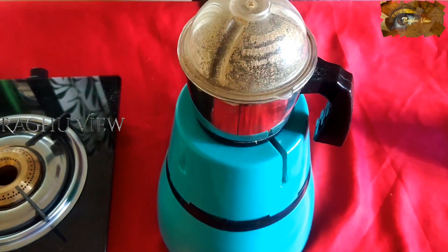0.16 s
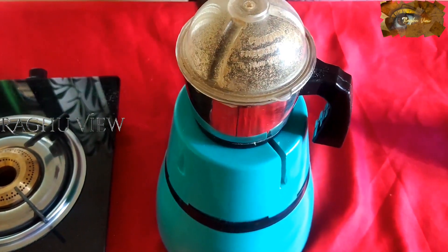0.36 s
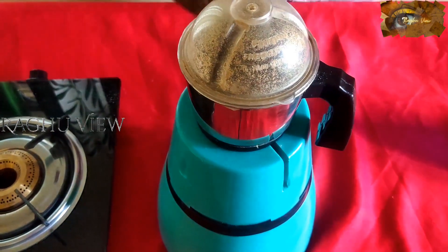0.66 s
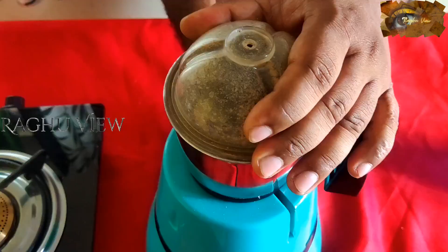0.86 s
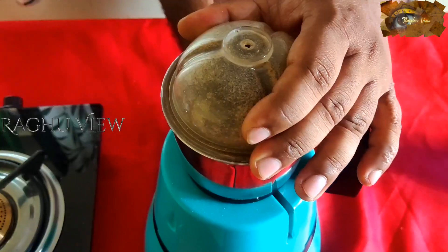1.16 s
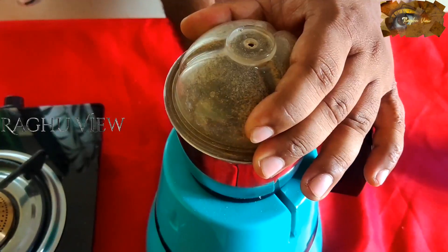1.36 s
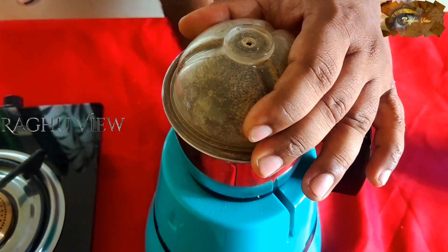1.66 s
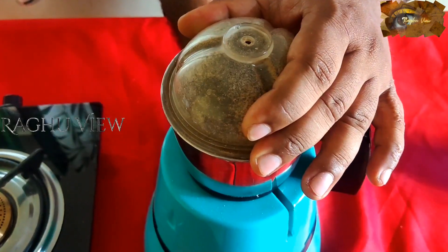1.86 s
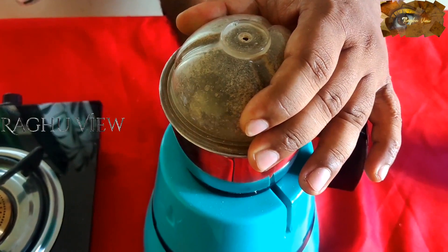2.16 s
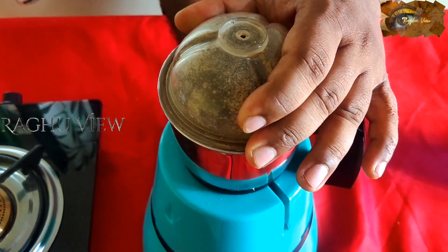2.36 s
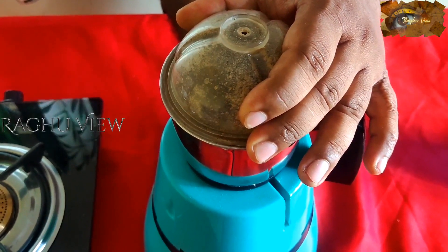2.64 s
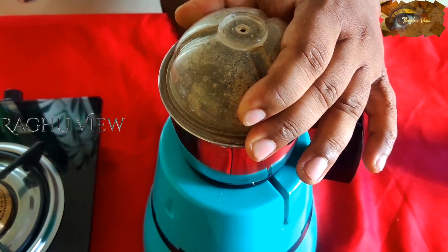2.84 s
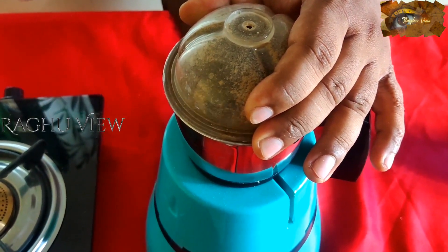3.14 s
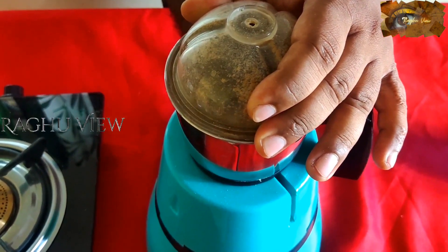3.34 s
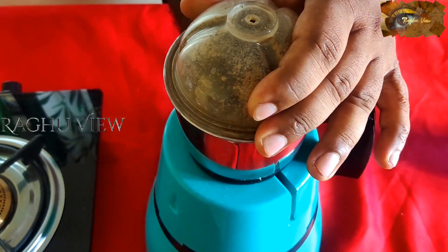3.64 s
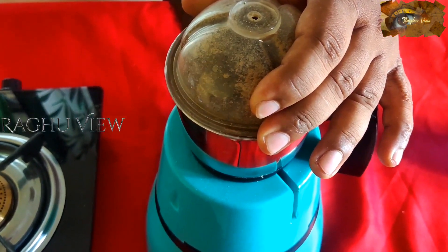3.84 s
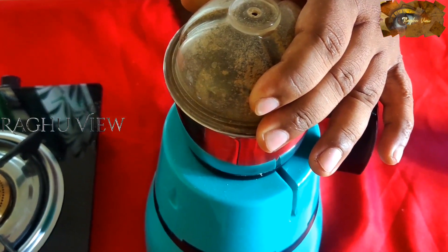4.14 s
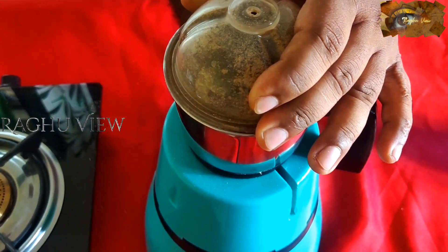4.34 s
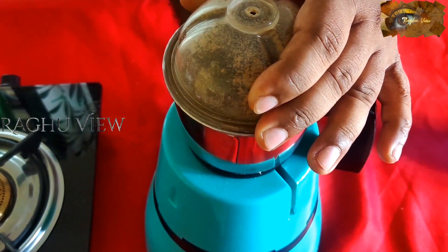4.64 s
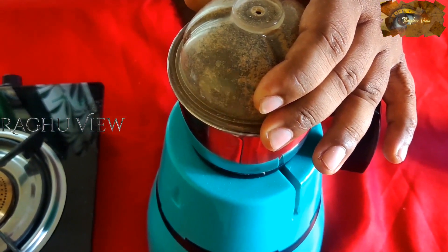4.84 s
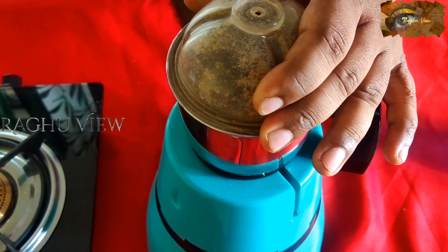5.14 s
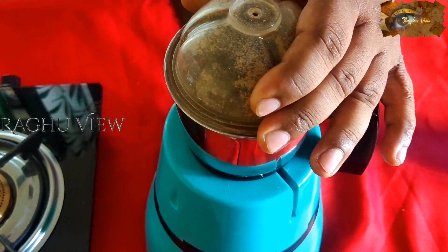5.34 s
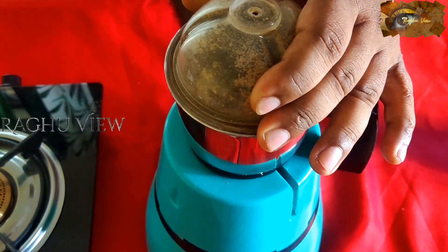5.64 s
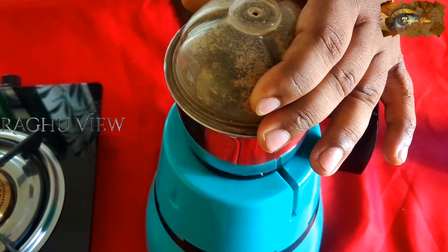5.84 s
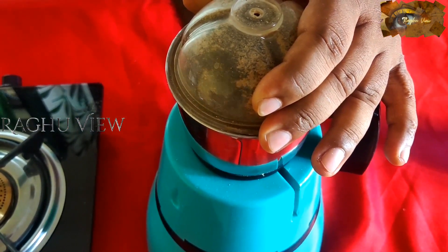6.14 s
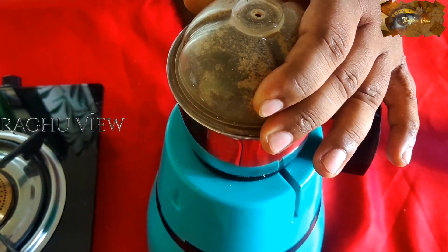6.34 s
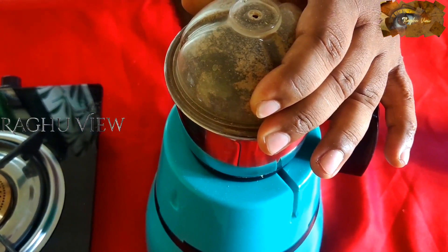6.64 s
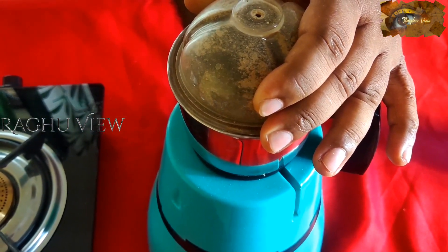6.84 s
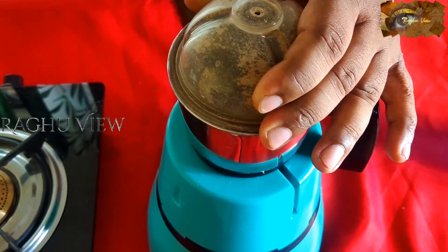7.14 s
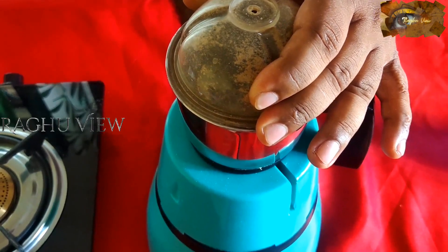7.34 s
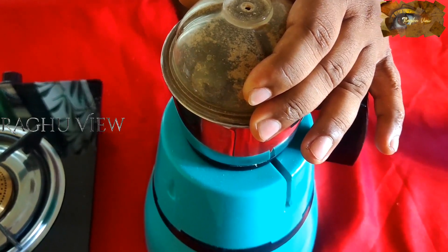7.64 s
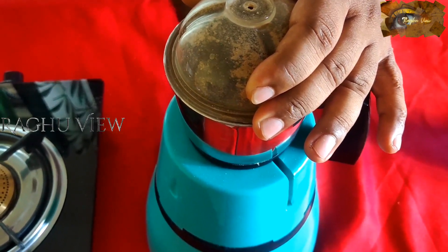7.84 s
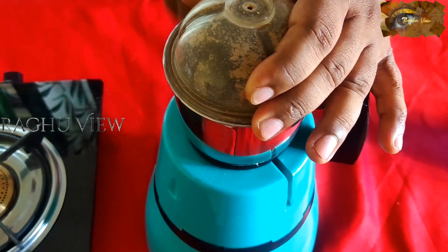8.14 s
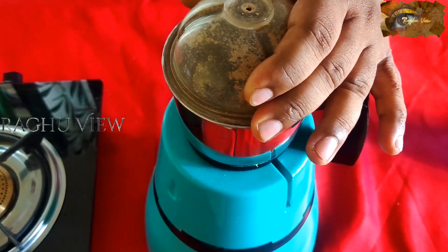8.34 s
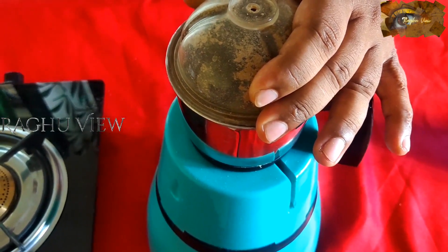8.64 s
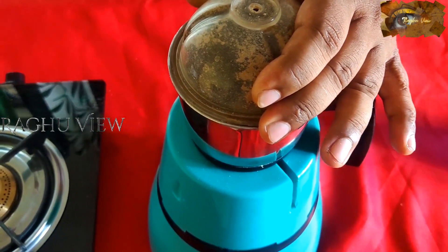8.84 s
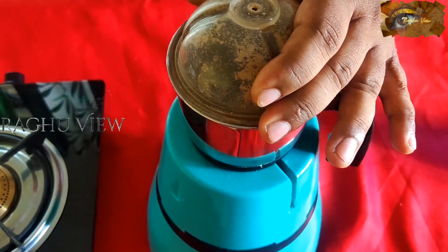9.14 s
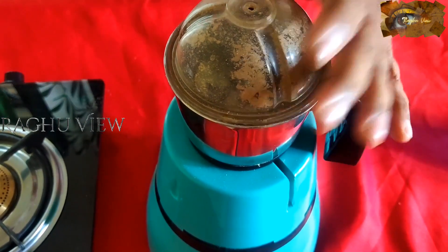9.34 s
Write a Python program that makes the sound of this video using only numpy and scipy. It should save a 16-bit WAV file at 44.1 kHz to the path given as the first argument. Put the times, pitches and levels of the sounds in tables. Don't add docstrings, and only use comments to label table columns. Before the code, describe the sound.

From 0 to about 0.2 s the last scrap of an earlier grinding burst dies away with tiny ticks, then near silence with a barely audible touch around 0.4 and 0.7 s. At 0.75 s a kitchen grinder starts abruptly at full loudness: a dense, bright, gritty roar of dry spices pelting a steel jar and lid, with a buzzing motor hum that rises slightly over the first two seconds and then holds. Larger pieces knock irregularly, and cooling air makes low pops and rumble on the close stereo microphone, mostly before 5 s. The hiss gradually softens as the spices get finer. At 7.4 s the power goes off; the hum slides down and blurs, loose fragments tumble and clatter from 7.6 to 8.7 s, duller and weaker. Soft housing touches follow around 9.0 to 9.4 s, fading into silence. Little room sound.

```python
import sys
import numpy as np
from scipy import signal
from scipy.fft import rfft, irfft, next_fast_len
from scipy.io import wavfile
from scipy.ndimage import uniform_filter1d, minimum_filter1d

SR = 44100
rng = np.random.default_rng(int(sys.argv[2]) if len(sys.argv) > 2 else 0)


def amp(db):
    return 10 ** (np.asarray(db, float) / 20)


def write(x):
    x = np.atleast_2d(x).T
    wavfile.write(sys.argv[1], SR, np.round(np.clip(x, -1, 1) * 32767).astype(np.int16))


N = 418499

HZ = np.fft.rfftfreq(next_fast_len(N), 1 / SR)
SWITCH_ON_S, SWITCH_OFF_S = 0.7526, 7.42


def rms_one(x):
    return x / np.sqrt(np.mean(x ** 2) + 1e-20)


def in_time(rows):
    s, *columns = np.transpose(rows)
    return np.array([np.interp(np.arange(N) / SR, s, c) for c in columns])


def at_hz(points):
    hz, value = np.transpose(points)
    return np.interp(np.log(HZ + 1), np.log(hz + 1), value)


def dying(x, t60):
    return signal.lfilter([1], [1, -amp(-60 / (t60 * SR))], x + 1e-18)


def softened(x, rise_ms):
    r = np.exp(-1000 / (rise_ms * SR))
    return signal.lfilter([(1 - r) ** 2], [1, -2 * r, r * r], x)


def drift(rate):
    r = np.exp(-80 * np.pi * rate / SR)
    slow = signal.lfilter([1], [1, -2 * r, r * r], rng.standard_normal(N // 40 + 2002))[2000:]
    return np.interp(np.arange(N) / 40, np.arange(len(slow)), rms_one(slow))


SPLITS_HZ = [450, 2300, 5600, 10000]
# (frequency [Hz], likeness [0 to 1])
LIKENESS = [(60, .1), (120, 0.36), (240, 1), (480, 0.83), (950, 0.082), (1890, 0.41), (3300, 0.23),
            (4500, 0.53), (5200, 0.16), (6500, 0.062), (9000, 0.15), (15000, .05)]
# (frequency [Hz], lead [radians])
LEAD = [(0, -1.5), (3620, 0.46), (4220, 1.5), (4480, -7), (5170, -8), (6370, -13), (7150, -10.5),
        (8100, -20.5), (8960, -16.5), (12000, -21), (13500, -20.5), (15200, -27)]


def grinding(turn):
    shower_db, pan_db = shower()
    levels = amp(shower_db + np.array([[1.5], [-1.5], [1.5], [1.5], [1.5]]))
    resting = (np.arange(N) < .4 * SR) | (np.arange(N) > SWITCH_ON_S * SR)
    coarse = grains(turn, per_s=250, spread_db=7.5, t60=0.057, steady=4.6, beat=.055)
    fine = grains(turn, per_s=370, spread_db=2.0, t60=0.032, steady=1.83, beat=.12)
    blows = knocks([0.075, 0.024, 0.027, 0.022, 0.032], 0.35, room_db=-16.5, rise_ms=1.6)
    loudness = np.hypot(resting * levels * [coarse ** 1.2, coarse, coarse, fine, fine], blows)
    loudness = loudness ** 2 / (loudness + amp(-85))

    below = [1 / (1 + (HZ / hz) ** 8) for hz in SPLITS_HZ]
    bands = np.diff([0 * HZ, *below, 1 + 0 * HZ], axis=0)
    jar = jar_response()
    alike = np.clip(at_hz(LIKENESS), 0, .99)
    lead = np.exp(.5j * at_hz(LEAD))
    white, out = rng.standard_normal((2, N)), 0
    for band, level in zip(bands, loudness):
        mid, side = rfft(white * level, next_fast_len(N))
        mid, side = np.sqrt(1 + alike) * mid, np.sqrt(1 - alike) * side
        colour = band * jar / np.sqrt(2 * np.mean(np.abs(band * jar) ** 2))
        out = out + colour * [(mid + side) * lead, (mid - side) / lead]

    gate_db = [(.36, 0), (.44, -60), (SWITCH_ON_S - .004, -60), (SWITCH_ON_S - .001, -12),
               (SWITCH_ON_S + .002, 0)]
    pan = amp((pan_db - 1.5) / 2 * [[1], [-1]])
    return amp(in_time(gate_db)) * irfft(out, next_fast_len(N))[:, :N] * pan


# (time [s], level [dB])
VIGOUR = [(.751, 0.5), (.84, 1.5), (.92, 0), (1.23, 2), (1.4, 0.5), (2.3, 0.5), (2.61, 0.5), (5.07, 0),
          (7.27, -0.5), (7.41, 1), (7.53, 0.5), (8.13, -0.5), (8.5, -7.5), (8.58, -8.5), (8.7, -22),
          (8.89, -23), (9.05, -49), (9.49, -76)]
# (level [dB], change as the spice gets finer [dB/s], step at switch-off [dB],
# share of the vigour [ratio])
SHOWER_BANDS = [
    (-19, -0.19, -0.5, 1.01),
    (-22.5, 0.02, -6, 1.28),
    (-19, 0.08, -8, 0.89),
    (-15.5, -0.5056, -1.5, 1.75),
]
# (level [dB], fall [dB/s])
EARLIER = [
    (-42, 134.5),
    (-35.5, 198.5),
    (-45.5, 150),
    (-43, 146.5),
    (-43, 137),
]


def shower():
    t = np.arange(N) / SR
    vigour_db, = in_time(VIGOUR)
    off = np.clip((t - SWITCH_OFF_S) / 0.1, 0, 1)
    worn_s = np.clip(t, SWITCH_ON_S, SWITCH_OFF_S) - SWITCH_ON_S
    running_db = [-33.5 - 81.5 * np.maximum(t - 8.75, 0)]
    for db, wear_db, step_db, share in SHOWER_BANDS:
        running_db.append(db + wear_db * worn_s + step_db * off + share * vigour_db)
    earlier_ends_s = 0.09
    earlier_db = [db - fall_db * np.maximum(t - earlier_ends_s, 0) for db, fall_db in EARLIER]
    settled_s, running_pan_db, coasting_pan_db = 8.75, 0.5, 2.5
    leaning = off - np.clip((t - settled_s) / 0.092, 0, 1)
    pan_db = running_pan_db + leaning * (coasting_pan_db - running_pan_db)
    return np.where(t < SWITCH_ON_S / 1.5, earlier_db, running_db), pan_db


def grains(turn, per_s, spread_db, t60, steady, beat):
    sizes = amp(spread_db * np.minimum(rng.exponential(1, N), 5))
    struck = sizes * (rng.random(N) < per_s * amp(2.5 * drift(14)) / SR)
    pulsing = 1 + beat * np.cos(turn) + beat * 1.2 * np.cos(2 * turn)
    strikes = rms_one(softened(dying(struck, t60), rise_ms=.9))
    return rms_one((steady + strikes) * pulsing)


# (time [s], peak [dB], brightness [dB])
KNOCKS = [(0.793, 0, -9), (1.13, -2.5, -9), (1.358, -5.5, -7.5), (1.536, -6, -5.5), (1.607, 0, -10),
          (2.008, -5, -11), (2.078, -0.5, -3.5), (2.226, -10, -4), (3.256, -3.5, -11), (3.787, -9.5, -2.5),
          (3.903, -1.5, -4.5), (4.032, -1, -3), (4.179, -9.5, -2), (5.039, -3, -4), (5.309, 0, -7),
          (5.444, -3, -6.5), (5.552, -7.5, -4), (6.055, -8, -6.5), (6.255, -4.5, -8.5), (6.566, -1.5, -6)]
# (time [s], peak [dB], brightness [dB], thud [dB])
TUMBLES = [(0.004, -24.5, -11, -12), (0.04, -17.5, -21, -21), (7.667, -12.5, -16, -8.5),
           (7.771, -10, -6.5, -17.5), (7.888, -16.5, 3.5, -14), (7.981, -11.5, -4.5, -15.5),
           (8.035, -9.5, -9.5, -12.5), (8.071, -16.5, -4.5, -12.5), (8.179, -13.5, -5.5, -15.5),
           (8.207, -15.5, -9, -15), (8.242, -8.5, -9.5, -21.5), (8.271, -14, -13.5, -11.5),
           (8.337, -9, -15.5, -12.5), (8.366, -21, -13, -11), (8.431, -14, -13, -15),
           (8.5, -9.5, -9.5, -15), (8.557, -13.5, -10, -23), (8.592, -13.5, -13.5, -23),
           (8.633, -16, -21, -24.5), (8.664, -17.5, -22, -17), (8.686, -17.5, -14.5, -21),
           (8.782, -15, -25.5, -26.5), (8.833, -12, -35, -17.5), (8.878, -25, -31, -9.5),
           (8.927, -25.5, -24.5, -9.5), (8.969, -23, -17, -22), (9.011, -40.5, -24, -10.5),
           (9.231, -41, -13, -7), (9.248, -38.5, -14, -5.5), (9.261, -42.5, -18, -6.5)]
# (level against the peak [dB], share of the brightness [ratio],
# share of the thud [ratio])
BLOW_COLOUR = [
    (-3, .01, 1.18),
    (-6, 0.037, -0.099),
    (-9, 0.075, 0.023),
    (0, .55, -0.069),
    (10, 1.42, 0.12),
]


def knocks(t60, room_t60, room_db, rise_ms):
    knock_offset_db, knock_thud_db = -3.5, -12
    powered = [(s, db + knock_offset_db, bright, knock_thud_db) for s, db, bright in KNOCKS]
    s, peak_db, bright_db, thud_db = np.transpose(powered + list(TUMBLES))
    band_db = [peak_db + db + bright * bright_db + thud * thud_db for db, bright, thud in BLOW_COLOUR]
    blows = np.zeros((5, N))
    blows[:, (s * SR).astype(int)] = amp(band_db)
    ringing = np.array([dying(row, t) for row, t in zip(blows, t60)])
    return softened(ringing + amp(room_db) * dying(blows, room_t60), rise_ms)


# (frequency [Hz], width [Hz], left level [dB], right level [dB])
JAR = [(289, 67, 5, 4.5), (686, 336, 10, 11), (1373, 146, 16, 10.5), (1927, 390, 15.5, 13.5),
       (2662, 440, 6, 5.5), (3560, 88, 6, 4), (4057, 76, 8.5, 3.5), (4830, 220, 4.5, -16.9),
       (6320, 700, 6, 1), (7000, 580, 9, 3), (8610, 900, 2.5, 7), (10500, 250, -6.5, -4),
       (11920, 260, 8, -6), (13440, 1100, 7.5, 0)]
# (frequency [Hz], level per Hz [dB])
BODY = [(60, -32), (120, -14), (250, 0.5), (500, -8.5), (1000, -3.5), (2300, -7.5), (3300, -1.5),
        (5000, 0.5), (7500, -1.5), (10000, -3.5), (15500, -6.5)]


def jar_response():
    response = amp(at_hz(BODY)) * np.ones((2, 1), complex)
    for hz, width, *side_db in JAR:
        gain = np.sqrt(amp(np.array(side_db)))[:, None]
        spring = hz ** 2 - HZ ** 2
        response = response * (spring + 1j * HZ * width * gain) / (spring + 1j * HZ * width / gain)
    return response


# (multiple of its speed, level against the curve [dB], left-right [dB])
IMBALANCE = [(1, -0.99, -8)]
# (multiple of shaft speed, level against the curve [dB], left-right [dB])
BLADE = [(3, -.1, -5)]
# (multiple of shaft speed, level against the curve [dB], left-right [dB])
FAN = [(9, -0.13, 2.1)]
# (multiple of shaft speed, level against the curve [dB], left-right [dB])
OTHER_ORDERS = [(2, -8, -2), (4, -3.5, -2), (5, -4, 10), (6, -0.6, -6.5), (8, -8, -4.5), (15, -10, -4),
                (19, -8.5, 8.5)]
# (multiple of shaft speed, level [dB], left-right [dB])
EARLY_ORDERS = [(7, -0.6, 6.5), (10, -3, -2.5)]


def motor(turn, levels_db):
    out = np.zeros((2, N))
    sounding, = in_time([(.82, 0), (1.12, 1), (8.0, 1), (8.3, 0)])
    coasting, = in_time([(7.4, 0), (7.5, 1)])
    wobbling = turn + (0.046 + .09 * coasting) * drift(12)
    for orders, curve_db in zip([IMBALANCE, BLADE, FAN, OTHER_ORDERS, EARLY_ORDERS], levels_db):
        waver_db = 1.0 + (2.2 if len(orders) > 1 else 0) + 3 * coasting
        for multiple, db, pan_db in orders:
            tone = np.sin(round(multiple) * wobbling + 2 * np.pi * rng.random())
            level_db = curve_db + db + waver_db * drift(12.4) - 0.45 * multiple * coasting
            out += np.sqrt(2) * amp(level_db) * tone * amp(np.array([[pan_db], [-pan_db]]) / 2)
    return sounding * out


# (time [s], speed [Hz])
SHAFT = [(.9, 196), (1.1, 202), (1.21, 203.5), (1.36, 207), (1.97, 207.3), (2.2, 209.2), (2.56, 210.9),
         (2.94, 212.2), (4.92, 212.6), (5.6, 212.2), (7.07, 213), (7.16, 214.3), (7.38, 214.6)]
# (level at full speed [dB], change below it [dB/Hz], level at switch-off [dB], change after [dB/s])
HUM = [
    (-39.5, 1.05, -26, -40),
    (-17, -1.53, -41.5, -5),
    (-22, -1.1, -40, -3),
    (-29, -0.4, -37, -2.5),
    (-37, 1.48, -38.5, -3.5),
]


def drive():
    full_hz, coast_s = 211.4, .9
    since_s = np.maximum(np.arange(N) / SR - SWITCH_OFF_S + .04, 0)
    powered_hz, = in_time(SHAFT)
    off = np.clip((since_s - .035) / .04, 0, 1)
    short_hz = np.maximum(full_hz - powered_hz, 0)
    levels_db = []
    for db, db_per_hz, off_db, db_per_s in HUM:
        powered_db = db + np.minimum(db_per_hz * short_hz, 7)
        levels_db.append((1 - off) * powered_db + off * (off_db + db_per_s * since_s))
    return powered_hz * np.exp(-since_s / coast_s), levels_db


# (time [s], frequency [Hz], level [dB], t60 [s])
TOUCHES = [(.388, 290, -60, 0.25), (.721, 170, -58, .05), (9.39, 515, -70, 0.84), (9.235, 290, -50, .3),
           (8.98, 680, -47, .5)]


def touches():
    t, out = np.arange(N) / SR, 0
    for s, hz, db, t60 in TOUCHES:
        level = amp(db - 60 * np.abs(t - s) / t60 + 3.2 * drift(40))
        out = out + (t > s) * level * np.sin(2 * np.pi * hz * (t - s))
    return out


# (time [s], peak [dB], left-right [dB])
POPS = [(0.797, -12, 3), (0.892, -12.5, 19), (1.004, -18, -21), (1.042, -15, -30), (1.169, -16, -24.5),
        (1.245, -8.5, -6.5), (1.306, -13, -36), (1.359, -12, -25.5), (1.688, -19.5, -12.5),
        (1.728, -9.5, -3), (1.87, -21, -28), (1.9, -13.5, -16.5), (1.94, -11.5, -30), (2.062, -14, -16.5),
        (2.462, -17, -6), (2.517, -9, -35), (2.653, -17.5, -29), (3.09, -20, 15), (3.162, -15.5, -27.5),
        (3.212, -14.5, -36.5), (3.286, -13.5, -45), (3.685, -14, -41), (3.908, -19.5, -3),
        (4.037, -24, -23), (4.424, -9, -35), (4.494, -18.5, -17), (4.581, -20, -24), (4.627, -14.5, -30),
        (5.313, -15, -22), (6.367, -16.5, -29.5)]


def pops(cycle_ms, cut_hz, second_db):
    out, chance = np.zeros((2, N)), rng.random((len(POPS), 8))
    for (s, db, pan_db), draw in zip(POPS, chance):
        for side, lean_db in enumerate([pan_db, -pan_db]):
            length, sign, gap, order = draw[4 * side:4 * side + 4]
            gap_s = (.012 + .016 * gap) * np.sign(order - .3)
            for late_s, shorter, drop_db in [(0, 1, 0), (gap_s, .55, second_db * gap)]:
                size = int(shorter * cycle_ms * (0.54 + .6 * length) * SR / 1000)
                swing = np.sin(2 * np.pi * np.linspace(0, 1, size) ** 0.47) * np.sign(sign - .5)
                at = int((s + late_s) * SR) - size // 2
                out[side, at:at + size] += amp(db + 7.5 + drop_db + min(lean_db, 0)) * swing
    return signal.sosfilt(signal.butter(2, cut_hz, "high", fs=SR, output="sos"), out)


def buffeting(db, fade_db):
    rumble = signal.butter(2, [60, 300], "band", fs=SR, output="sos")
    low = signal.sosfilt(rumble, rng.standard_normal((2, N)))
    blowing = in_time([(.75, -49), (.78, 3.5), (7.4, fade_db), (8.6, -22.5), (9.1, -50)])
    return rms_one(low) * amp(db + blowing + 5 * np.array([drift(15) - .8, drift(14)]))


def scene():
    shaft_hz, levels_db = drive()
    turn = 2 * np.pi * np.cumsum(shaft_hz) / SR
    air = pops(cycle_ms=6.2, cut_hz=90, second_db=-7.0) + buffeting(db=-37.5, fade_db=-7.5)
    floor = amp(-100) * rng.standard_normal((2, N))
    return grinding(turn) + motor(turn, levels_db) + touches() + air + floor


def thinned(x, margin_db, soft_db, from_hz, loud_db):
    pair = np.array([[1, 1], [1, -1]]) / np.sqrt(2)
    hz, _, cells = signal.stft(np.float32(pair @ x), SR, nperseg=2048)
    power = np.abs(cells) ** 2 + 1e-16
    band = np.add.reduceat(power, np.arange(0, 1025, 10), axis=1) / 10
    band = np.repeat(band, 10, axis=1)[:, :1025]
    band = uniform_filter1d(band, size=2, axis=2)
    masker = uniform_filter1d(power[:, hz > from_hz].mean(axis=(0, 1)), size=5)
    calm = minimum_filter1d(power.mean(axis=(0, 1)), size=7)
    quiet_db = np.clip(loud_db - 10 * np.log10(calm) - 2.5, 0, 40)
    spare_db = 10 * np.log10(band / masker) + margin_db + quiet_db
    favour_db = 20 * (hz < from_hz) + 1.8 * (hz > 5800) - 1.5 * (np.abs(hz - 4750) < 500) - .8 * (hz < 5800)
    spare_db += favour_db[:, None]
    kept = (.5 + .5 * np.tanh(spare_db / soft_db)) * (hz < 15540)[:, None]
    return pair @ signal.istft(cells * kept, SR, nperseg=2048)[1][:, :N]


def low_pass(x):
    return signal.sosfilt(signal.butter(12, 15640, fs=SR, output="sos"), x)


def record(dry):
    thin = thinned(dry, margin_db=3.5, soft_db=.3, from_hz=2100, loud_db=-56)
    return low_pass(np.clip(thin, -1, 1))


dry = scene()
out = record(dry)
write(out)
```